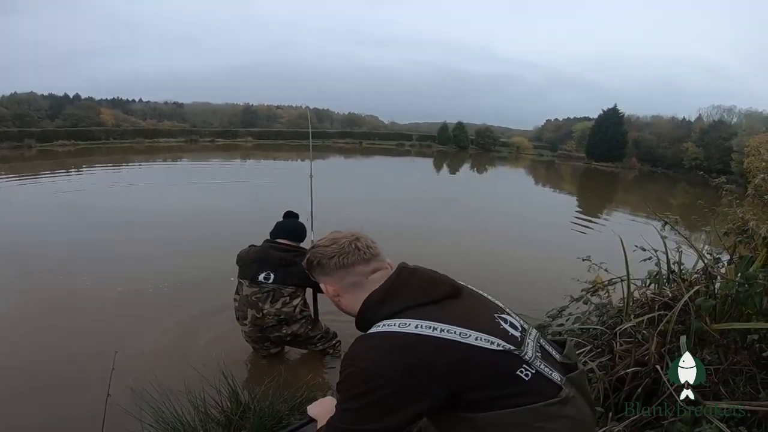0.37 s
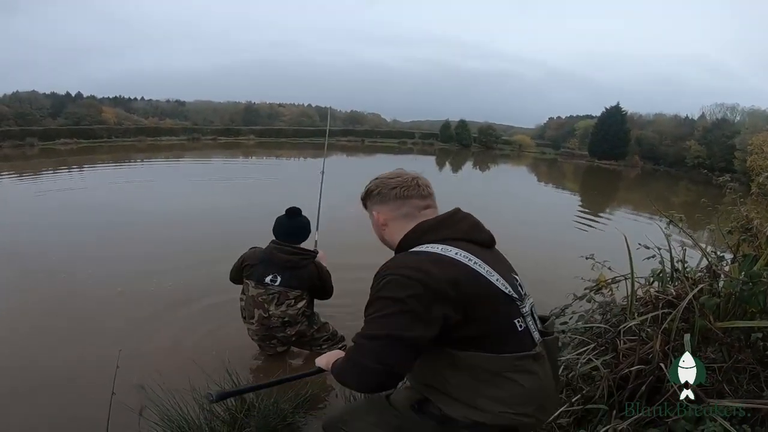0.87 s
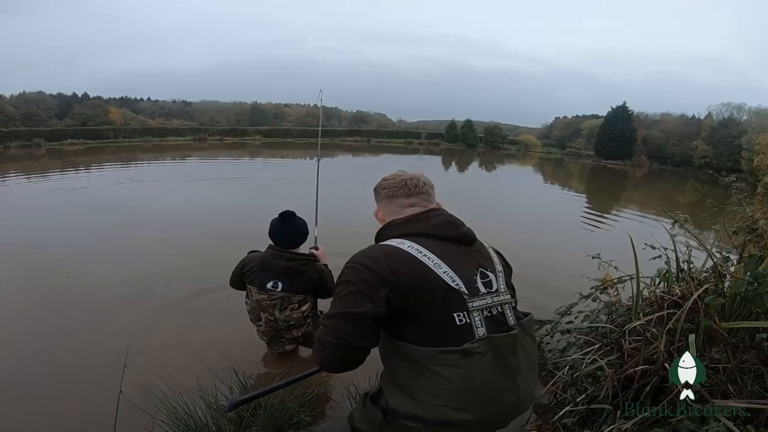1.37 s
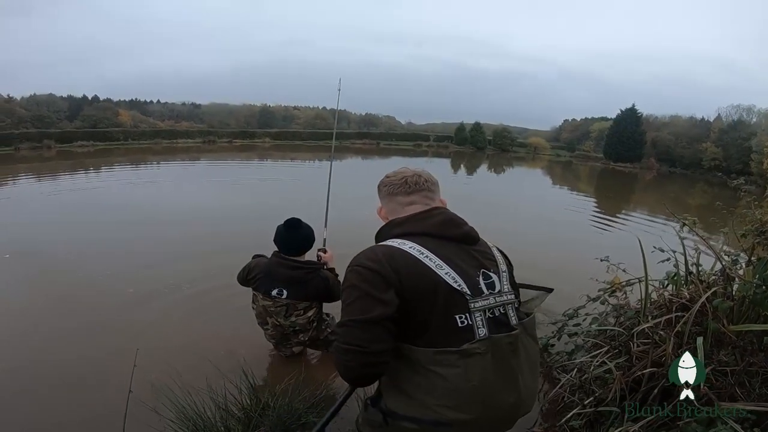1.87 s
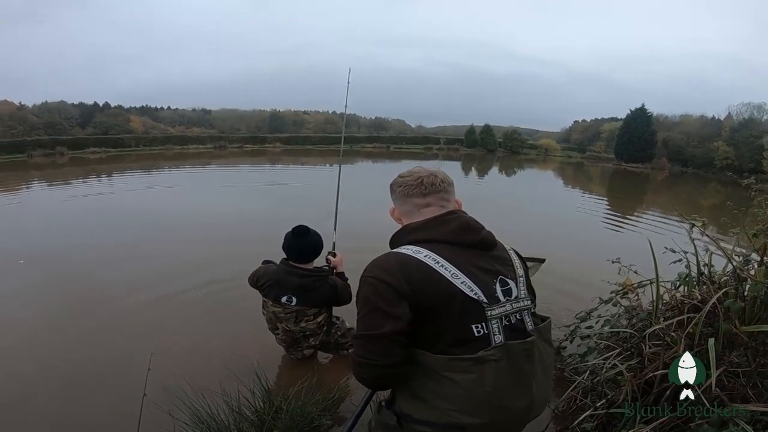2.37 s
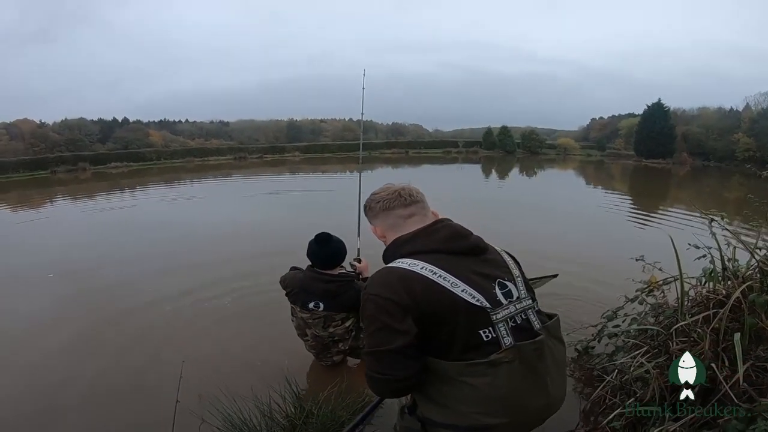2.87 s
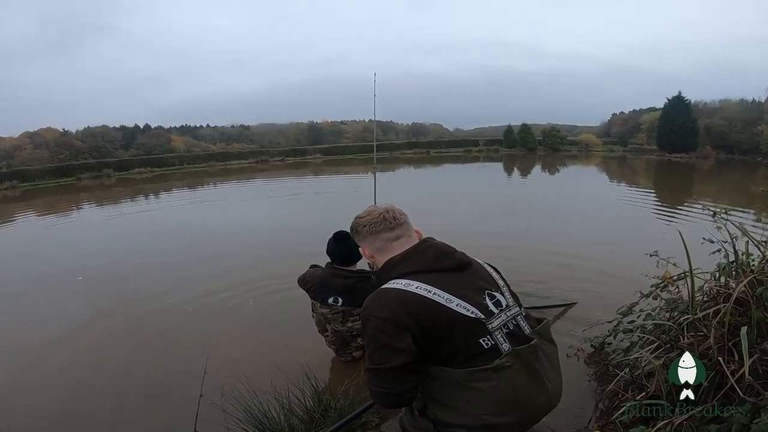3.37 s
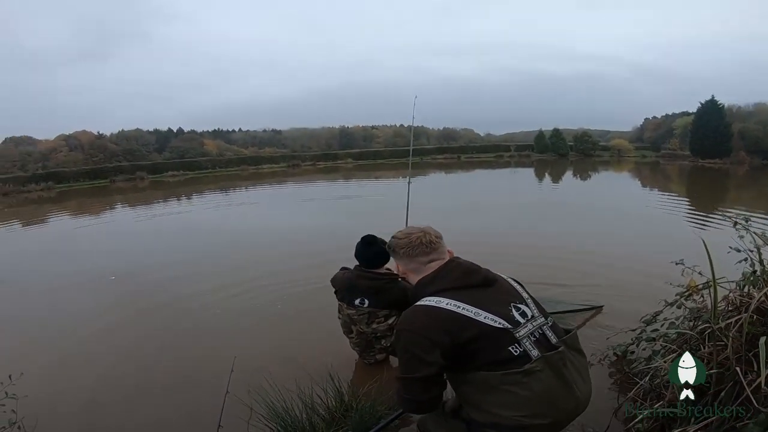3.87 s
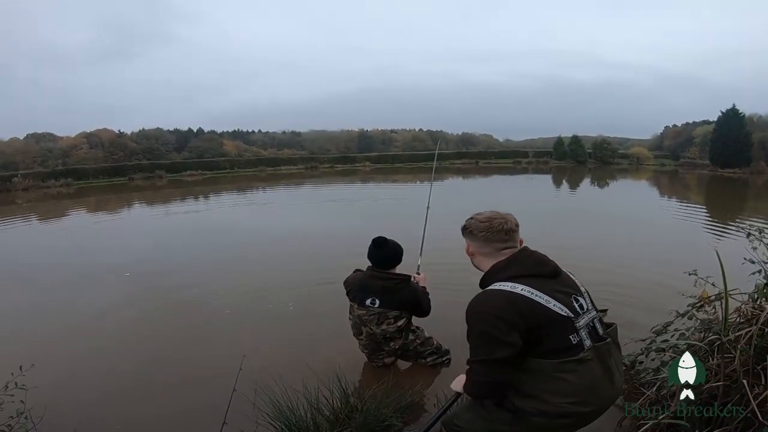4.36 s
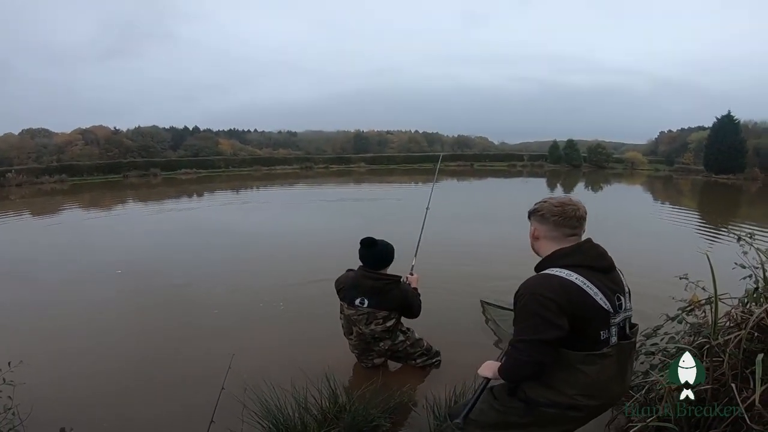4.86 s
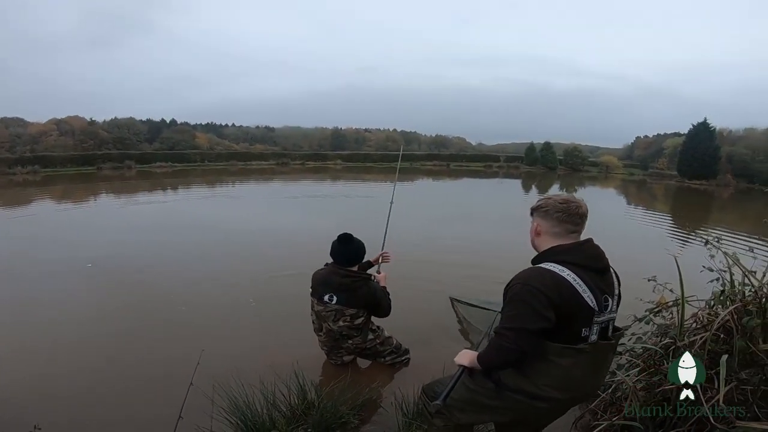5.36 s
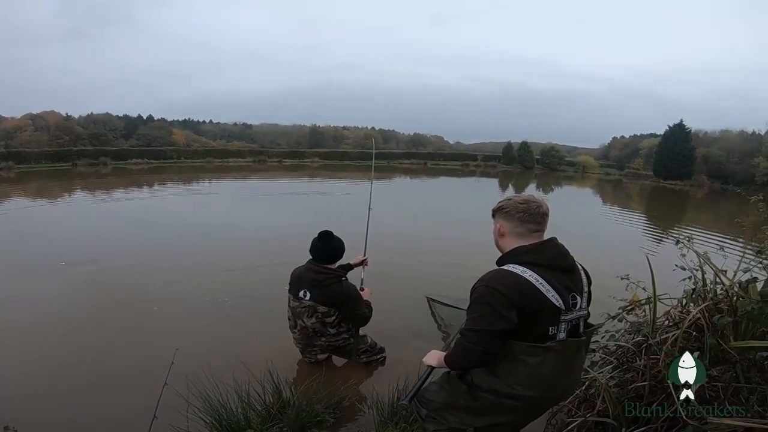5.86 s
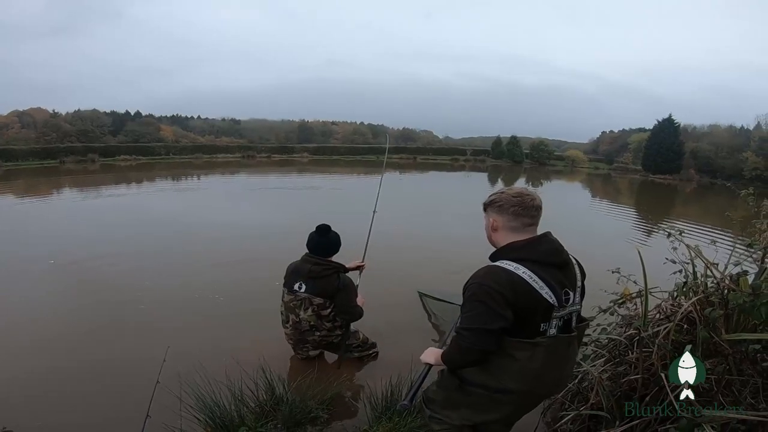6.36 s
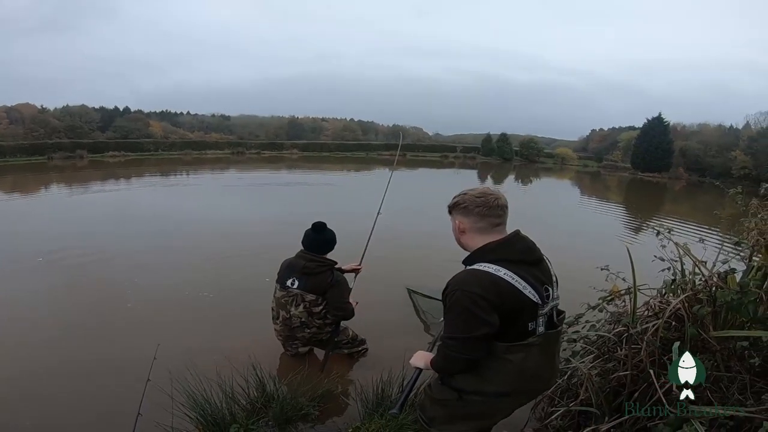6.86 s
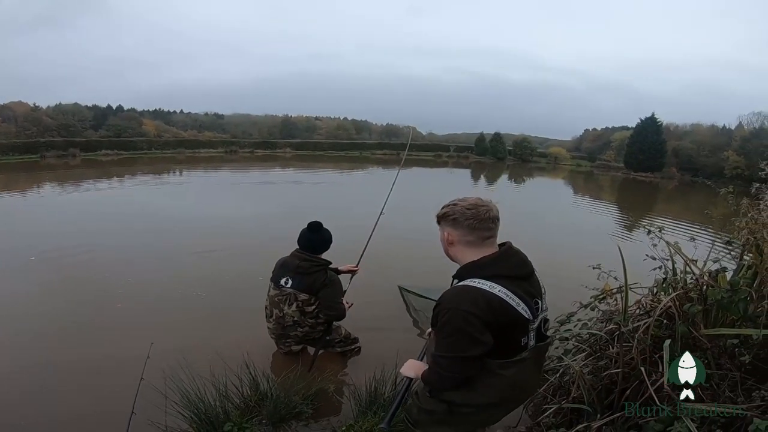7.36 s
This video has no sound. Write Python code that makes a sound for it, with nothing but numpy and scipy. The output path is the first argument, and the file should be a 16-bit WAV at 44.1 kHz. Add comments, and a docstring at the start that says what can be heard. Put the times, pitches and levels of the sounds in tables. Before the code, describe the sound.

Close wading splashes and plopping bubbles come in uneven bursts between calmer drips, while a small camera rumbles and knocks and distant birds chirp thinly.

```python
"""Water slaps, gurgles and drips close by as an angler wades at the edge of a still lake, and waders rustle.
Filtered noise makes the stirring and slaps; short damped tones make the bubbles.
Wind and hands shake a small camera: noise and ringing tones make its mount and shell sound, low in the right port.
Small birds, made of gliding tones with echoes, call across the water over a murmur of filtered noise."""
import sys
import numpy as np
from scipy import signal
from scipy.fft import rfft, irfft, next_fast_len
from scipy.io import wavfile
from scipy.ndimage import uniform_filter1d, map_coordinates

SR = 44100
rng = np.random.default_rng(int(sys.argv[2]) if len(sys.argv) > 2 else 0)


def master_out(mix):
    """Clip the mix to full scale and print it as 16-bit PCM to the path in sys.argv[1]."""
    frames = np.transpose(np.atleast_2d(mix))
    ceiling = np.clip(frames, -1, 1)
    pcm = np.round(ceiling * 32767).astype(np.int16)
    wavfile.write(sys.argv[1], SR, pcm)


def convert_level_to_amplitude(level_db):
    """Map a level in decibels to its linear amplitude factor."""
    exponent = np.asarray(level_db, float) / 20
    return 10 ** exponent


N = 340844  # length in samples

# left level minus right for sounds from the open air: pitch_hz, difference_db
AIR_SIDES = [(60, 6), (700, 0), (4000, 1), (15000, -1)]


def water():
    """Stirred water, slaps, drops and bubbles, heard together at the two ports."""
    # surges of stirred water and cloth: peak_s, rise_s, fall_s, gurgle_db, fizz_db (before trims)
    surges = [(0.23, .4, .35, -61, -60), (0.6, .2, .4, -63, -56.5), (0.95, .15, .5, -52, -49.5),
              (1.24, .06, .12, -41, -39), (1.38, .2, .25, -44, -50), (2.1, .8, .6, -69.5, -62.5),
              (2.68, .2, .5, -60, -55.5), (2.93, .5, .1, -53, -53), (3.05, .1, .5, -60, -62.5),
              (3.36, .1, 0.18, -51, -54.5), (3.5, .1, .2, -52, -55), (3.73, .3, .3, -55, -57),
              (4.06, .3, .22, -64, -62), (4.77, .12, .15, -67, -65), (5.35, .05, .3, -42.5, -54),
              (5.49, .14, .2, -42, -50), (5.67, .15, .2, -45.5, -50.5), (6.27, .25, .25, -43, -50),
              (6.07, .1, .12, -52, -56), (6.5, .25, .5, -56, -59.5), (7.06, .08, .5, -57, -61.5),
              (7.48, .3, .35, -57, -60)]
    # the lake at rest: gurgle_db, fizz_db (before trims)
    calm_db = (-76.5, -79)
    # left level minus right for water: pitch_hz, difference_db
    water_sides = [(500, -11.5), (1300, -11.5), (4400, -6), (8000, -4.5), (15000, -0.5)]
    gurgle_db, fizz_db = swells(surges, calm_db, curve=1.1)
    sound = splashing(gurgle_db, fizz_db) + plopping() + froth(gurgle_db, fizz_db)
    return ports(sound, water_sides, alike=0.44)


def splashing(gurgle_db, fizz_db):
    """Low gurgle and high fizz noise follow the stirring; each slap is a ragged burst of both."""
    # colour of the gurgle: pitch_hz, level_db
    gurgle_colour = [(240, -27.5), (400, -4.5), (657, -7), (1930, -1.5), (2220, -4.5), (3530, -8),
                     (5000, -52), (6500, -41), (11000, -120)]
    # colour of the fizz: pitch_hz, level_db
    fizz_colour = [(350, -15), (1470, -11.5), (2500, -14.5), (3500, -11), (3900, -12), (5140, -13.5),
                   (6420, -6), (9490, -18.5), (10700, -36), (13600, -34), (15600, -53.5), (15900, -120)]
    body, spray = slap_bursts()
    # a slap breaks into separate drops
    body = body * convert_level_to_amplitude(1.2 * wobble(300))
    spray = spray * convert_level_to_amplitude(3 * wobble(350))
    gurgle = convert_level_to_amplitude(gurgle_db - 0.8 + 3.6 * wobble(35))
    fizz = convert_level_to_amplitude(fizz_db + 2.5 + 2.7 * wobble(30))
    low = (gurgle + body) * patchy(hiss(table(gurgle_colour), 0.18), depth_db=5.5)
    high = (fizz + spray) * patchy(hiss(table(fizz_colour), 0.35), depth_db=2.0)
    return low + high


def slap_bursts():
    """Loudness curves of the slaps and of small drops: a quick start, then a fading tail."""
    # water slapping: time_s, body_db, spray_db (before trims), fade_s (to 60 dB down)
    slaps = [(1.2039, -34, -17.5, 0.053), (1.2136, -32, -22, 0.0095), (1.251, -25, -24, 0.048),
             (1.364, -31, -33.5, 0.044), (3.3301, -35.5, -39, 0.072), (3.475, -32.5, -55, 0.031),
             (3.491, -56, -33, 0.036), (3.6277, -42, -52, 0.043), (3.7025, -35.5, -54, 0.037),
             (5.318, -33, -47.5, 0.11), (5.474, -53, -42, 0.16), (5.6444, -32.5, -32, 0.043),
             (5.669, -30, -33, 0.038), (6.2508, -24.5, -32, 0.037)]
    # small drops ticking on the surface: time_s, level_db (before a trim)
    drops = [(1.843, -42), (1.9268, -42), (2.0453, -40.5), (2.142, -41.5), (2.2093, -44), (2.2793, -42),
             (2.418, -44.5), (2.59, -41), (3.442, -39), (4.242, -40), (4.688, -47), (4.739, -46),
             (4.771, -38), (5.556, -30.5), (5.605, -33), (5.366, -31), (5.571, -38), (5.658, -29),
             (5.676, -33), (5.735, -38), (6.212, -29), (6.288, -30), (6.305, -39), (6.325, -38),
             (6.345, -39), (6.36, -34), (6.415, -36), (6.509, -42), (6.553, -39), (7.2471, -35),
             (7.452, -33.5), (7.687, -43), (7.4726, -39), (7.5932, -37)]
    body, spray = np.zeros(N + SR), np.zeros(N + SR)
    t = np.arange(SR // 4) / SR
    for s, body_db, spray_db, t60 in slaps:
        start = round((s - .002) * SR)
        burst = convert_level_to_amplitude(-60 * t / t60) * (1 - np.exp(-t / (0.031 * t60)))  # a long slap also starts softly
        body[start:][:len(t)] += convert_level_to_amplitude(body_db + 0.5) * burst
        spray[start:][:len(t)] += convert_level_to_amplitude(spray_db + 2.0) * burst
    for s, db in drops:
        start = round((s - .001) * SR)
        spray[start:][:len(t)] += convert_level_to_amplitude(db - 8.5 - 60 * t / 0.026)
    return body[:N], spray[:N]


def plopping():
    """Single bubbles ring briefly; some burst at the surface with a sharper upward sweep."""
    # single bubbles: time_s, level_db, pitch_hz (at first), fade_s (to 60 dB down)
    plops = [(0.786, -22, 1570, 0.0038), (1.084, -27, 665, 0.027), (1.295, -23, 1446, 0.03),
             (1.338, -17, 2080, 0.016), (1.365, -9, 6600, 0.0031), (1.365, -13.5, 1210, 0.0088),
             (1.399, -24, 5900, 0.007), (1.33, -27, 1250, .03), (1.424, -27, 1700, .02),
             (1.447, -27, 1500, .015), (1.483, -35, 1650, .05), (3.688, -27, 1350, .04),
             (3.694, -28, 2100, .012), (3.768, -28, 2000, .012), (3.853, -42, 6450, .05),
             (5.669, -14, 1800, .006), (5.51, -24, 3400, .012), (5.411, -26, 6300, .012),
             (3.105, -16.5, 1508, 0.0085), (1.256, -17, 502, 0.027), (1.368, -23.5, 563, 0.034),
             (1.475, -32.5, 786, 0.053), (3.162, -29.5, 2830, 0.0075), (5.322, -18.5, 1092, 0.04),
             (3.18, -25, 904, 0.052), (3.203, -22, 1090, 0.0076), (3.3305, -9, 2450, 0.0029),
             (3.495, -22, 2200, 0.0063), (5.317, -21.5, 1800, 0.0096), (5.333, -9, 810, 0.014),
             (5.365, -16.5, 1770, 0.027), (5.401, -20, 820, 0.035), (5.478, -15.5, 7500, 0.0044),
             (5.646, -18, 3280, 0.014), (5.663, -15.5, 3340, 0.0052), (5.341, -20, 666, 0.03),
             (3.341, -17, 2200, 0.004), (3.33, -32.5, 280, 0.053), (5.65, -7.5, 6300, 0.0046),
             (5.472, -25.5, 4100, 0.0083), (5.497, -20, 910, 0.014), (5.539, -25, 3640, 0.015),
             (5.918, -28, 1360, 0.041), (6.135, -27.5, 1400, 0.023), (6.028, -31, 3830, 0.0039),
             (6.051, -23.5, 1900, 0.0065), (6.076, -22, 5960, 0.006), (6.078, -25, 1170, 0.015),
             (6.201, -24.5, 2460, 0.019), (6.305, -25, 2210, 0.014), (6.096, -22.5, 1360, 0.0115),
             (6.222, -28, 2230, .01), (6.283, -23, 1970, 0.013), (6.342, -26, 2800, 0.011),
             (6.201, -25, 960, 0.071), (6.249, -7.5, 3350, 0.002), (6.247, -15, 1394, 0.023),
             (6.263, -27, 4760, 0.01), (7.037, -31, 766, 0.028), (7.142, -31, 730, 0.027),
             (7.513, -28.5, 1400, 0.019), (7.63, -37, 628, 0.074), (7.271, -27.5, 2020, 0.017),
             (7.451, -32.5, 1470, 0.021), (7.505, -24, 2030, 0.013)]
    # bubbles bursting at the surface: start_s, level_db, first_pitch_hz, fade_s (to 60 dB down)
    chirps = [(1.432, -26, 1700, .02), (5.394, -23, 2200, .025), (5.508, -16, 1250, .025),
              (5.746, -21.5, 1880, .035), (6.036, -23, 780, .035), (6.16, -29, 1950, .05),
              (6.388, -25, 780, .06), (6.48, -29, 1330, .035), (6.489, -27, 3400, .018)]
    s, db, hz, t60 = np.transpose(plops)
    sound = bubbles(s - .0015, db, hz, t60, rise=0.079)
    sound += bubbles(*np.transpose(chirps), rise=.3)
    return sound * convert_level_to_amplitude(2 * wobble(320))  # the choppy surface makes each ring flutter


def froth(gurgle_db, fizz_db):
    """Swarms of small random bubbles: two follow the gurgle and two higher ones the fizz."""
    sound = swarm(gurgle_db + 7, 2100, 0.48, cycles=20.0, scatter_db=3.0, count=800)
    sound += swarm(gurgle_db + 10.5, 1966, 0.57, cycles=22.6, scatter_db=3.5, count=220)  # separate blips
    sound += swarm(fizz_db - 1.0, 6200, 0.22, cycles=29, scatter_db=7.0, count=500)
    sound += swarm(fizz_db + 9.5, 6100, 0.28, cycles=6.7, scatter_db=4.5, count=900)  # spray ticking down
    return sound


def swarm(level_db, centre_hz, spread, cycles, scatter_db, count):
    """Random bubbles, denser and louder where the water is stirred; each sits at its own side."""
    u, z = rng.random((count, 2)), rng.standard_normal((count, 2))
    busy = np.cumsum(convert_level_to_amplitude(0.69 * level_db))
    s = np.interp(u[:, 0], busy / busy[-1], np.arange(N) / SR)
    hz = np.clip(centre_hz * np.exp(spread * z[:, 0]), 500, 9000)
    db = level_db[(s * SR).astype(int)] - scatter_db * np.log(1 - .95 * u[:, 1])
    lag_s = np.abs(z[:, 1]) * 6e-5
    left = bubbles(s + lag_s, db + 3 * z[:, 1], hz, cycles / hz, rise=0.17)
    right = bubbles(s, db, hz, cycles / hz, rise=0.44)
    return np.array([left, right])


def bubbles(s, db, hz, t60, rise):
    """Damped tones with a soft start, whose pitch climbs as they surface."""
    at = np.ceil(s * SR).astype(int)[:, None] + np.arange(round(1.2 * t60.max() * SR))
    t = at / SR - s[:, None]
    u = t / t60[:, None]
    tone = np.sin(2 * np.pi * hz[:, None] * t * (1 + rise * np.minimum(u, 1)))
    rows = convert_level_to_amplitude(db[:, None] - 60 * u) * (1 - np.exp(-u / .07)) * tone
    return np.bincount(at.ravel(), rows.ravel(), 2 * N)[:N]  # adds all tones into one line


def camera():
    """Shaking drives the mount and shell with noise; knocks set them ringing."""
    # left level minus right for the camera body: pitch_hz, difference_db
    body_sides = [(40, -10.5), (190, -22), (330, -7), (750, -3), (1360, 1)]
    return ports(shaking() + knocking(), body_sides, alike=0.76)


def shaking():
    """Wind and hands jolt the camera: resonant noise in a low sway, a shell ring and a higher buzz."""
    # jolts: peak_s, half_length_s, sway_db, ring_db, buzz_db (before trims)
    jolts = [(0.026, 0.77, -46.5, -45, -85), (0.854, 0.72, -42, -47, -60.5), (1.133, 1, -70, -41, -73),
             (2.276, 0.053, -33, -41.5, -57), (2.356, 0.17, -35, -32.5, -55),
             (2.624, 0.16, -31, -33.5, -63), (2.872, 0.06, -34.5, -26, -72), (3.005, 0.13, -37.5, -23, -58),
             (3.21, 0.15, -30.5, -43, -53), (3.509, 0.11, -23.5, -28.5, -50),
             (3.594, 0.085, -32.5, -57, -54.5), (3.744, 0.12, -43, -24.5, -47.5),
             (4.178, 0.37, -39, -34, -54.5), (4.619, 0.062, -38.5, -36.5, -63),
             (4.797, 0.18, -38, -40.5, -80), (4.936, 0.092, -44, -34.5, -57), (5.04, 0.11, -32.5, -57, -62),
             (5.256, 0.061, -63, -28.5, -80), (5.45, 0.093, -32.5, -20, -43), (5.591, 0.076, -35, -29, -37),
             (5.781, 0.27, -27.5, -26.5, -45.5), (5.894, 0.15, -23.5, -29.5, -43.5),
             (6.043, 0.19, -32, -26, -45.5), (6.358, 0.19, -23.5, -25.5, -45),
             (6.64, 0.32, -49, -37, -57.5), (6.8, 0.13, -38.5, -49.5, -57),
             (7.142, 0.24, -39.5, -36.5, -59.5), (7.356, 0.21, -36.5, -39.5, -63),
             (7.68, 1, -42.5, -43, -63)]
    # between jolts: sway_db, ring_db, buzz_db (before trims)
    still_db = (-58, -50, -73)
    rows = [(s, half, half, *db) for s, half, *db in jolts]
    sway_db, ring_db, buzz_db = swells(rows, still_db, curve=1.01)
    shaken = convert_level_to_amplitude(sway_db + 0.64 * wobble(9.2)) * hiss(peak(32.5, 28), 0.39)
    shaken += convert_level_to_amplitude(sway_db - 9.5 + 3.7 * wobble(13)) * hiss(peak(78.4, 28), 0.5)
    shaken += convert_level_to_amplitude(ring_db + 1.8 * wobble(17)) * hiss(peak(177.9, 39.6), 1.0)
    shaken += convert_level_to_amplitude(ring_db - 13.5 + 4.2 * wobble(30)) * hiss(peak(238, 153), 0.45)
    shaken += convert_level_to_amplitude(buzz_db + 2.2 * wobble(44)) * hiss(peak(1312, 330), 0.9)
    shaken += convert_level_to_amplitude(buzz_db - 2 + 1.7 * wobble(24)) * hiss(peak(701, 180), 1.0)
    return shaken


def knocking():
    """Each knock rings fading tones of shell and mount and a click, until the hand stills them."""
    # knocks on the mount: start_s, shell_db, sway_db, click_db (each added to the levels below)
    knocks = [(1.079, -36.5, -64, -34), (2.956, -14, -9, -22.5), (2.982, -16, -13, -21.5),
              (3.469, -22.5, -34.5, -38), (3.494, -29.5, -34, -42.5), (3.719, -28, -35, -33),
              (4.802, -27, -48, -33), (5.18, -24.5, -68, -33), (5.572, -23.5, -24.5, -23),
              (6.011, -14.5, -25, -33), (6.318, -12.5, -22.5, -23.5), (6.334, -9, -30, -25.5)]
    # tones of the shell: pitch_hz, level_db, fade_s (to 60 dB down, before the grip)
    shell = [(189, 6, 0.053), (314.6, -8.5, 0.12), (95.5, -0.5, 0.12)]
    # tones of the swaying mount: pitch_hz, level_db, fade_s (to 60 dB down, before the grip)
    mount = [(43.3, -2, 1.5), (66, -4, .3), (80, 4, .1)]
    # tones of the click: pitch_hz, level_db, fade_s (to 60 dB down, before the grip)
    click = [(660, 0.5, 0.023), (1360, -10.5, 0.077), (970, -2, 0.018), (1700, -15.5, 0.019),
             (450, 2, .035)]
    grip_s, grip_fade_s = 0.22, 0.086  # time after each knock; extra fading to 60 dB down
    blows, t = np.zeros(N + SR), np.arange(SR // 2) / SR
    grip = convert_level_to_amplitude(-60 * np.maximum(t - grip_s, 0) / grip_fade_s)  # the hand closes on the ringing mount
    for s, *levels in knocks:
        for db, modes in zip(levels, (shell, mount, click)):
            ring = np.zeros(len(t))
            for hz, level, t60 in modes:
                build_up = 1 - np.exp(-3 * hz * t)  # mostly there within the first cycle
                ring += convert_level_to_amplitude(db + level - 60 * t / t60) * np.sin(2 * np.pi * hz * t) * build_up
            blows[round(s * SR):][:len(t)] += ring * grip
    return blows[:N]


def birds():
    """Bird voices reach the ports directly and through a short tail of random echoes."""
    sound = paired_calls() + songs()
    t = np.arange(SR // 10) / SR
    echoes = rng.standard_normal((2, SR // 10)) * convert_level_to_amplitude(-60 * t / .12 - 31)  # scattered by the trees
    echoed = signal.fftconvolve(sound[None], echoes, axes=1)[:, :N]
    return ports(sound + echoed, AIR_SIDES, alike=0.61)


def paired_calls():
    """Two voices of one call glide down together, each with an unsteady pitch and level."""
    # two-voiced calls: start_s, length_s, low_voice_db, high_voice_db (glide level is added)
    calls = [(0.141, 0.135, -51, -57), (1.92, 0.16, -54.5, -53), (5.044, 0.14, -53, -54),
             (7.103, 0.18, -55, -55)]
    # glide of a call: share_of_call (0 to 1), low_voice_hz, high_voice_hz, level_db
    glide = [(0, 5950, 6250, -14), (.07, 5470, 6170, -9), (.4, 5340, 6040, -3), (.72, 5180, 5900, -8),
             (1, 5180, 5870, -22)]
    t, sound = np.arange(N) / SR, np.zeros(N)
    share, low_hz, high_hz, shape_db = np.transpose(glide)
    for s, length, low_db, high_db in calls:
        u = (t - s) / length
        on = convert_level_to_amplitude(np.interp(u, share, shape_db, -120, -120))
        late_db = high_db - 120 * (u < .12)  # the high voice joins late
        for hz, db in ((low_hz, low_db), (high_hz, late_db)):
            level = on * convert_level_to_amplitude(db + 3.5 * wobble(90))
            sound += level * tone_of(np.interp(u, share, hz) + 22 * wobble(300))
    return sound


def songs():
    """One bird warbles thin high notes, its pitch swinging quickly; another whistles plainly downward."""
    # notes of the high song: start_s, length_s, first_pitch_hz, last_pitch_hz, level_db
    notes = [(6.1, 0.15, 7700, 8450, -61), (6.33, 0.13, 7950, 8400, -61), (6.535, 0.155, 7900, 8450, -60.5),
             (6.74, 0.15, 8050, 7800, -64)]
    # plain falling whistles: start_s, length_s, first_pitch_hz, last_pitch_hz, level_db
    whistles = [(6.7, .065, 5150, 4880, -68)]
    warble_hz, warble_rate_hz = 130, 29  # swing either way, swings a second
    t, sound = np.arange(N) / SR, np.zeros(N)
    for rows, depth_hz in ((notes, warble_hz), (whistles, 0)):
        for s, length, first_hz, last_hz, db in rows:
            u = np.clip((t - s) / length, 0, 1)
            hz = first_hz + (last_hz - first_hz) * u
            hz = hz + depth_hz * np.cos(2 * np.pi * warble_rate_hz * (t - s)) + 50 * wobble(150)
            swell = np.sqrt(np.abs(np.sin(np.pi * u)))
            sound += swell * convert_level_to_amplitude(db + 1.8 * wobble(70)) * tone_of(hz)
    return sound


def tone_of(hz):
    """A sine whose pitch follows a curve in Hz."""
    return np.sin(2 * np.pi * np.cumsum(hz) / SR)


def lakeside():
    """The steady murmur of wind, trees and far traffic: coloured noise that drifts slowly in level."""
    # colour of the murmur: pitch_hz, level_db
    murmur_colour = [(29, -43), (50, -0.5), (78, 0.5), (110, -7.5), (150, 4), (185, -4), (222, -3),
                     (269, -11), (456, -25.5), (721, -17), (1030, -25), (1410, -26), (5170, -40),
                     (6900, -35.5), (12600, -49), (15600, -58.5), (15900, -120)]
    level_db = -45.5 + 1.5 * wobble(3)
    return ports(convert_level_to_amplitude(level_db) * hiss(table(murmur_colour), 0.65), AIR_SIDES, alike=0.5)


def ports(pair, balance, alike):
    """The two ports differ in level and phase; the power of their mean stays."""
    # how far the left port leads the right: pitch_hz, lead_radians (negative is behind)
    lead = [(20, -2), (200, -2), (340, -3.5), (1200, -3.5), (3400, -5.5), (6000, -7.5), (8000, -8.5),
            (15000, -12.5)]

    def response(hz):
        left, turn = convert_level_to_amplitude(along(balance, hz)), np.exp(1j * along(lead, hz))
        mean = np.sqrt(1 + left ** 2 + 2 * alike * left * turn.real) / 2
        return np.array([left * turn, np.ones_like(turn)]) / mean
    return filtered(pair, response)


def swells(rows, rest_db, curve):
    """A dB curve for each layer: events rise and fall, 20 dB down at their ends, over a resting level."""
    s, rise, fall, *layers = (c[:, None] for c in np.transpose(rows))
    t = np.arange(0, N / SR + .005, .005)
    shape_db = -20 * np.maximum((s - t) / rise, (t - s) / fall) ** curve
    power = [convert_level_to_amplitude(2 * rest) + convert_level_to_amplitude(2 * (db + shape_db)).sum(axis=0) for db, rest in zip(layers, rest_db)]
    return [np.interp(np.arange(N) / SR, t, 10 * np.log10(p)) for p in power]


def patchy(pair, depth_db):
    """Random patches of gain, hundreds of Hz wide and about 15 ms long, leave gaps in a noise."""
    z = signal.stft(pair, nperseg=256)[2]
    field = uniform_filter1d(rng.standard_normal(z.shape[1:]), size=4, axis=0)  # blur across pitch
    field = uniform_filter1d(field, size=5, axis=1)  # blur along time
    return unit(signal.istft(z * convert_level_to_amplitude(depth_db * unit(field)), nperseg=256)[1][:, :N])


def hiss(gain, alike):
    """A left and right noise of rms 1 that share the part alike."""
    a, b = rng.standard_normal((2, N))
    alike = np.clip(alike, 0, 1)
    left = alike * a + np.sqrt(1 - alike ** 2) * b
    return unit(filtered(np.array([left, a]), gain))


def table(spectrum):
    """Gain of a (Hz, dB) spectrum."""
    return lambda hz: convert_level_to_amplitude(along(spectrum, hz))


def peak(centre_hz, width_hz):
    """Gain of a steep resonance: a simple one applied twice."""
    return lambda hz: (1j * hz * width_hz / (centre_hz ** 2 - hz ** 2 + 1j * hz * width_hz + 1e-9)) ** 2


def filtered(x, response):
    """x with its spectrum multiplied by a response of frequency."""
    m = next_fast_len(N + SR // 2)
    return irfft(rfft(x, m) * response(np.fft.rfftfreq(m, 1 / SR)), m)[..., :N]


def wobble(rate):
    """A smooth random curve through rate random points a second."""
    return map_coordinates(rng.standard_normal(int(N * 400 / SR) + 4), [np.arange(N) * rate / SR])


def along(points, hz):
    """Reads (Hz, value) points on a log frequency axis."""
    f, v = np.transpose(points)
    return np.interp(np.log(hz + 1), np.log(f + 1), v)


def unit(x):
    """Scaled to rms 1."""
    return x / np.sqrt(np.mean(x ** 2) + 1e-20)


def scene():
    """Everything at the two ports."""
    return water() + camera() + birds() + lakeside()


def roll_off(x):
    """The treble ends steeply here."""
    return signal.sosfilt(signal.butter(12, 15780, fs=SR, output="sos"), x)


def record(dry):
    """The input clips at full scale, then loses everything from 15780 Hz up."""
    clipped = np.clip(dry, -1, 1)
    mix = filtered(clipped, lambda hz: hz < 15780)
    return roll_off(mix)


dry = scene()
out = record(dry)
master_out(out)
```